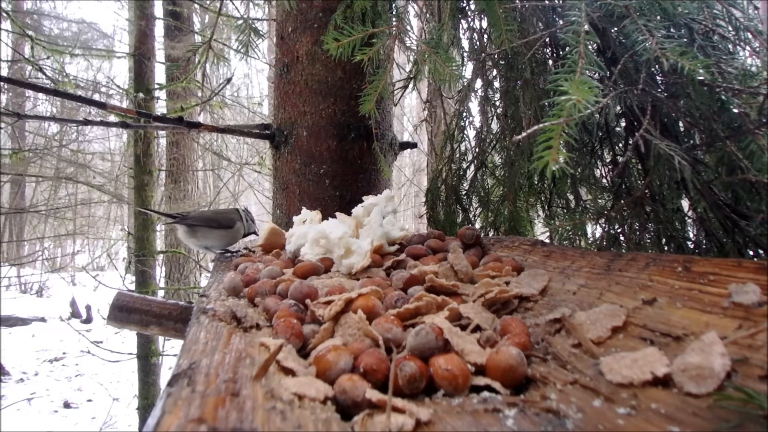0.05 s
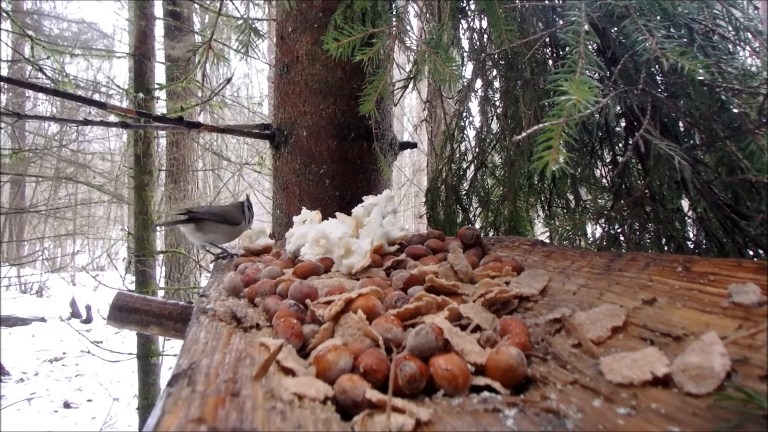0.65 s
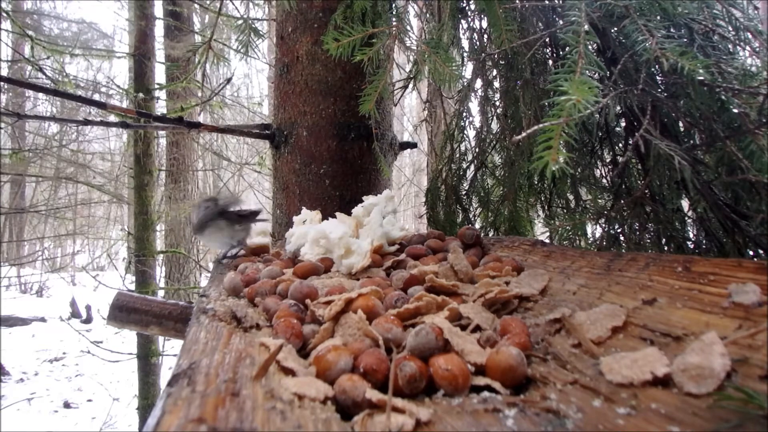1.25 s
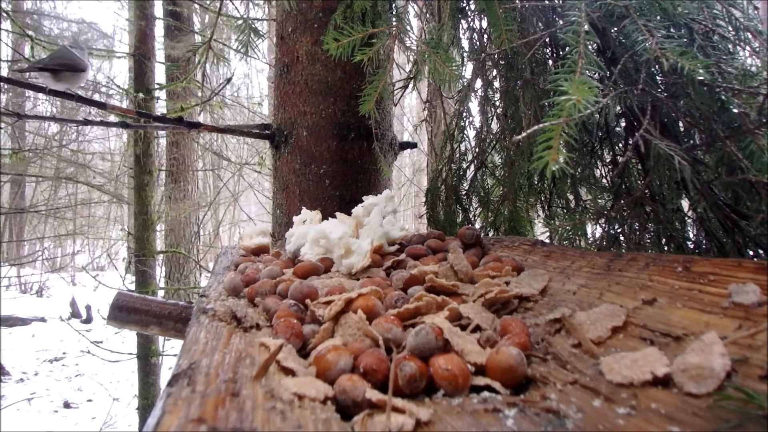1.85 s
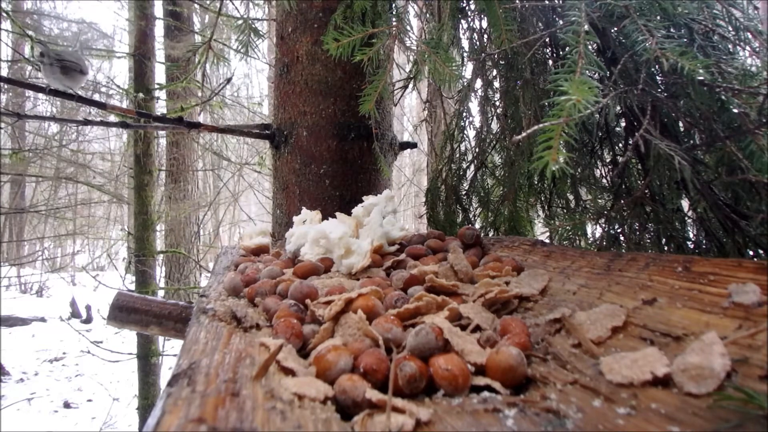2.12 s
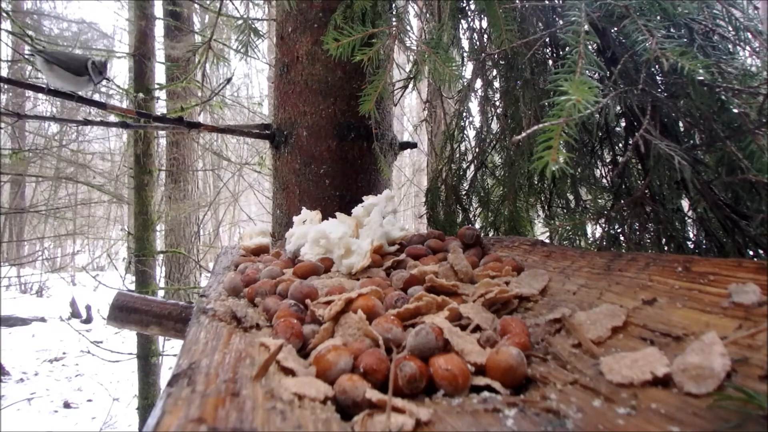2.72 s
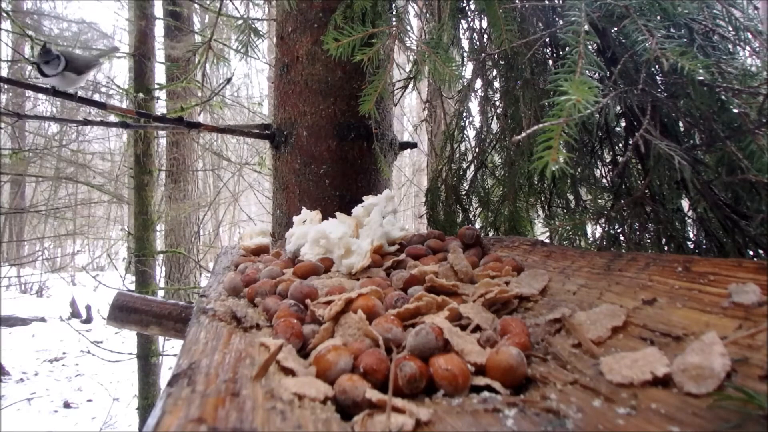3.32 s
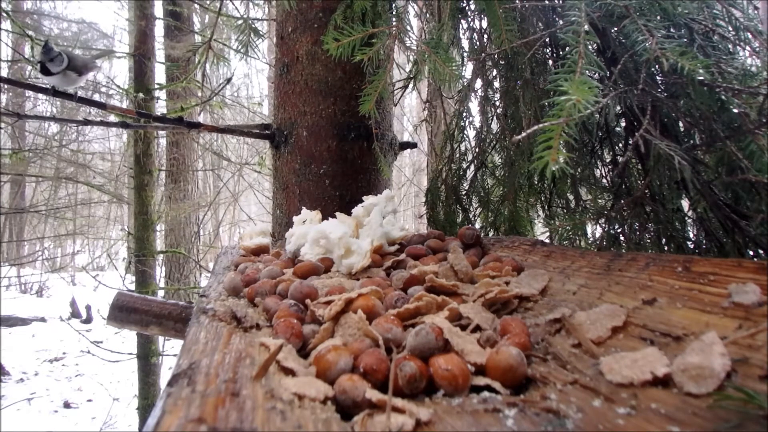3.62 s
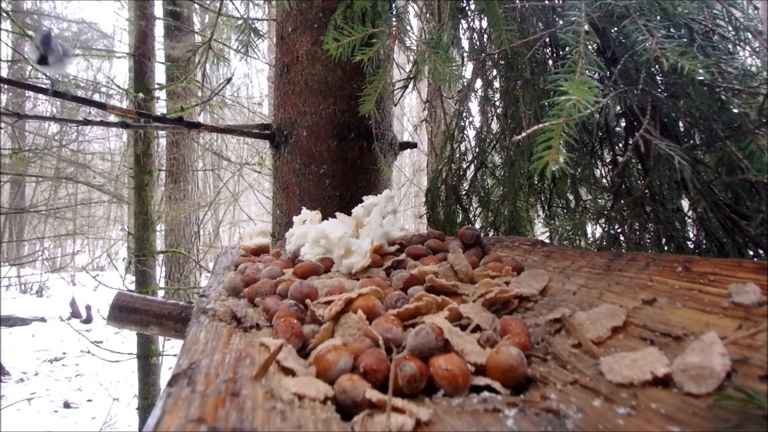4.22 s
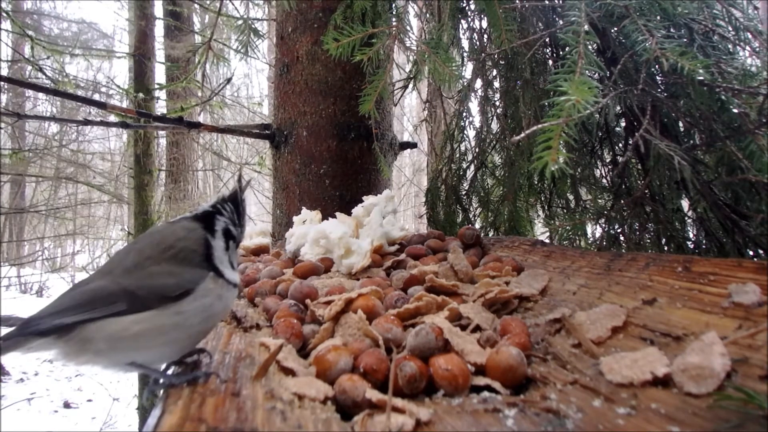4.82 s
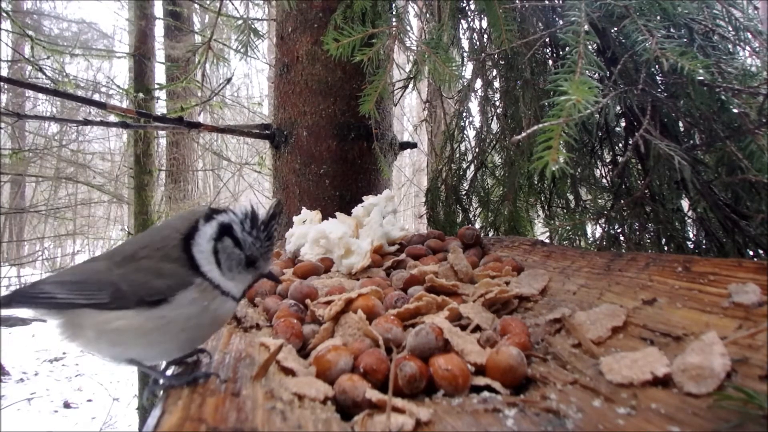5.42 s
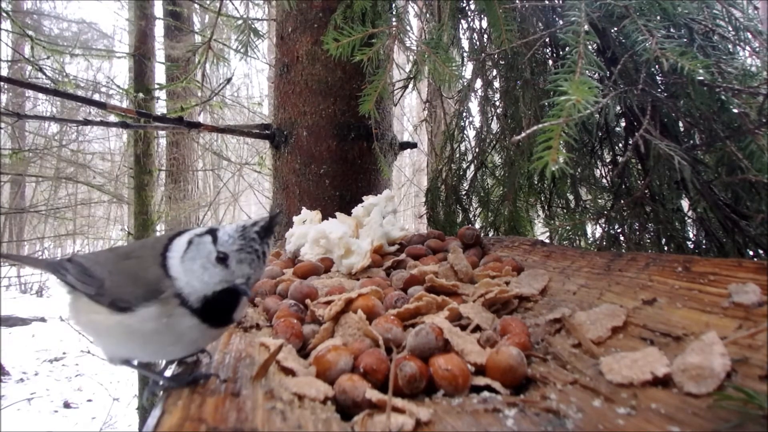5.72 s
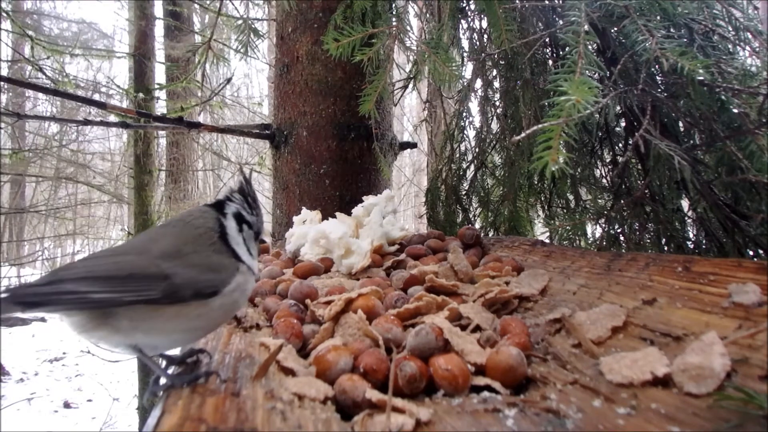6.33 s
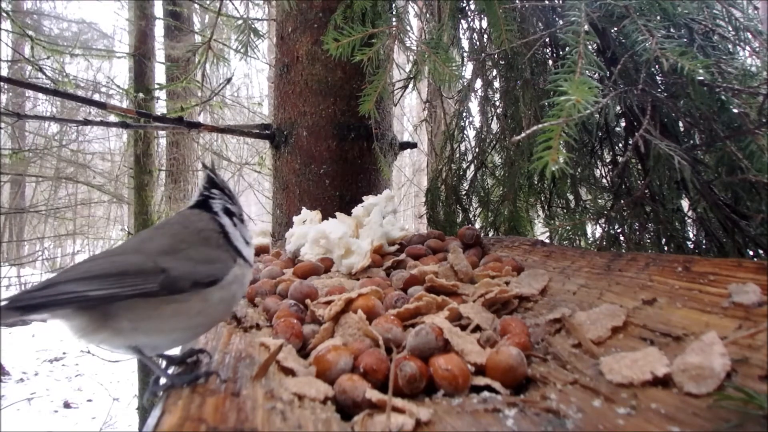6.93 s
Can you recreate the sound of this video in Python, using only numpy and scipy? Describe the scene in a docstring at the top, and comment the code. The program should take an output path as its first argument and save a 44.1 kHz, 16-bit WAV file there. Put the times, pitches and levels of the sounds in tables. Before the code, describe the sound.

High, thin bird calls over a soft forest hush, broken by ticks on wood, a hard click and a low thump of wings.

```python
"""Over the hush of a still winter forest come the thin trilled notes of a crested tit at a wooden feeder.
Its syrinx glides one nearly pure tone into trills, rising whistles and chips; a far bird twitters.
The tit flutters away and back, pushing puffs of air; beak, claws and dropped bits tick on the wood
and briefly ring the housing of a small camera. A morsel drops with a clack; one hard knock drives
the camera's limiter down, and the forest hush creeps back over about a second."""
import sys
import numpy as np
from scipy import signal
from scipy.fft import rfft, irfft
from scipy.io import wavfile
from scipy.ndimage import uniform_filter1d, minimum_filter1d

SR = 44100
rng = np.random.default_rng(int(sys.argv[2]) if len(sys.argv) > 2 else 0)


def pcm_store(signal):
    """Save signal as 16-bit PCM."""
    levels = np.round(np.clip(np.atleast_2d(signal), -1, 1) * 32767)
    wavfile.write(sys.argv[1], SR, levels.astype(np.int16).T)


N = 306936
T = np.arange(N) / SR

# Spectra of forest air, microphone hiss and wing rush. Each row: frequency in Hz, relative density in dB.
FOREST_SPECTRUM = [(20, -8.5), (42, -4.5), (80, -1), (150, -1.5), (280, -6.5), (600, -11.5), (1200, -16.5),
                   (2200, -20.5), (4000, -26), (8000, -57)]
HISS_SPECTRUM = [(1000, -3), (2700, -11.5), (3400, 11.5), (3950, 0.5), (4400, 9), (5200, -3.5), (6000, 3),
                 (7500, -0.5), (9000, 3), (11000, 1.5), (13000, 3), (15500, -2.5)]
RUSH_SPECTRUM = [(30, -4), (80, -2.5), (350, -4.5), (900, -15), (2500, -24), (6000, -31)]
# The far bird's purrs. Each row: start and length in seconds, first pitch, last pitch and pitch scatter
# in Hz, level at the source in dB.
FAR_PURRS = [(.96, .082, 5000, 4400, 300, -57.5), (1.037, .055, 5500, 5900, 850, -58),
             (1.125, .36, 5250, 5200, 950, -58.7), (3.95, .09, 4800, 4800, 1200, -61),
             (4.14, .41, 5100, 5000, 1100, -59)]
# Flutter at the board's edge. Each row: peak time, rise and fall constants in seconds, level in dB.
FLUTTER_BURSTS = [(.88, .15, .11, -48.5), (1.4, .08, .06, -48.5)]
# Wing strokes by the microphone. Each row: time in seconds, push level in dB, eddy level in dB.
WING_STROKES = [(4.455, -48, -43), (4.481, -24.5, -35), (4.515, -24, -34), (4.55, -31.5, -50)]
# Modes of the camera's housing and of a morsel striking the board. Each row: frequency in Hz,
# relative level in dB, time to decay by 60 dB in seconds.
HOUSING_MODES = [(380, -26, 0.0185), (1080, -30, 0.0083), (1700, -15.5, .006), (2370, -3.5, 0.022),
                 (2630, -4, 0.012), (3350, -18, .014), (4600, -14.5, 0.0078), (5780, -23.5, 0.014),
                 (6500, -14, 0.013)]
CLACK_MODES = [(970, -14, .04), (3150, -15, .045), (3623, 0, .028), (3795, -9, .026)]
# Taps on the feeder by beak, claws and dropped bits. Each row: start in seconds, crack level in dB, crack
# centre in Hz, # ring gain in dB, the crack's left minus right in dB.
LIGHT_TAPS = [(1.9952, -35.5, 4500, -49, 7), (2.5915, -47, 7000, -70, 6), (2.6375, -43, 5500, -58, 2),
              (2.877, -43.5, 8000, -70, 5), (3.0075, -42.5, 5500, -64, 3), (3.5818, -25.5, 6500, -33, -3),
              (3.5857, -38, 6400, -43, 9), (3.7568, -40.5, 1400, -64, 0), (4.8047, -46, 6000, -66, 10),
              (5.4436, -34, 4000, -35.5, -1), (5.806, -58, 4000, -43, -4), (6.3958, -48, 4000, -57, 4)]
# The tit's chips. Each row: time of the top and length in seconds, top pitch and droop in Hz, level in dB.
CHIP_NOTES = [(1.5, 0.023, 7880, 1690, -44.5), (1.912, 0.027, 8150, 1500, -45.5),
              (2.479, 0.025, 7540, 1000, -47), (5.089, 0.028, 8010, 1100, -44.5),
              (5.327, .028, 7630, 1100, -48.5), (5.68, 0.026, 7700, 1520, -41.5)]
# Its whistles. Each row: start and length in seconds, first and last pitch in Hz, then starting level,
# change over the note and left minus right in dB.
WHISTLE_NOTES = [(2.104, 0.092, 7400, 7880, -36.2, -9, 7.3), (3.617, .152, 7440, 8190, -37.5, -8.5, 8),
                 (4.414, .218, 7260, 8100, -51, -2.5, 1), (4.862, .142, 7350, 8250, -36, -18, 6.5)]
# Its trills. Each row: start and length in seconds; first and last base pitch, arch, overshoot, final
# drop and trill depth in Hz; base level, change over the note and left minus right in dB.
TRILL_NOTES = [(0.327, 0.179, 8170, 6650, 520, 600, 3000, 430, -36.5, -4.5, 3),
               (0.5505, .13, 7920, 7700, 100, 0, 2200, 170, -34.5, -3.5, 3),
               (0.743, 0.171, 7560, 7200, 500, 0, 900, 330, -38, 0, 3.5),
               (6.717, 0.182, 8300, 6700, 230, 420, 1400, 520, -33, -10, 2.5),
               (6.941, .13, 7890, 7620, 170, 0, 1900, 170, -35, -4.5, 2)]

CONTACT_S = .067
RING_SIDE_DB = -12.5  # the housing's ring reaches the right microphone port more strongly


def undb(db):
    """Amplitude grows tenfold for every 20 dB."""
    return 10 ** (np.asarray(db) / 20)


def unit(x):
    """Normalisation to an rms of one."""
    return x / np.sqrt(np.mean(x ** 2))


def clock(length):
    """Uniform sampling: the sample times of an event, in seconds."""
    return np.arange(int(length * SR)) / SR


def pan(db):
    """Level difference marks direction: two gains, left minus right in dB."""
    return undb(np.array([[db], [-db]]) / 2)


def add(out, start, x):
    """Superposition: a short sound adds to the mix at a time in seconds."""
    i = int(start * SR)
    out[:, i:i + x.shape[-1]] += x[..., :max(N - i, 0)]


def band_noise(size, hz, width_hz):
    """Resonance, applied twice, selects a band of white noise for each ear."""
    b, a = signal.iirpeak(min(hz, SR * .45), hz / min(width_hz, SR / 4), fs=SR)
    noise = rng.standard_normal((2, 2 * size))
    return unit(signal.lfilter(b, a, signal.lfilter(b, a, noise))[:, size:])


def coloured(spectrum):
    """Spectral shaping colours white noise, separately for each ear."""
    hz, db = np.transpose(spectrum)
    bin_hz = np.arange(N // 2 + 1) * SR / N
    gain = undb(np.interp(np.log(bin_hz + 1), np.log(hz), db))
    return unit(irfft(rfft(rng.standard_normal((2, N))) * gain, N))


def drift(size, rate_hz):
    """Averaging smooths random steps into a fluctuation with a spread near one."""
    hold = int(SR / rate_hz)
    steps = np.repeat(rng.standard_normal(size // hold + 2), hold)
    return uniform_filter1d(uniform_filter1d(steps, hold), hold)[:size]


def from_left(x, lag_s):
    """Path difference: sound from the left reaches the right port later."""
    delay = np.exp(-2j * np.pi * np.arange(N // 2 + 1) * SR / N * lag_s)
    return np.array([x[0], irfft(rfft(x[1]) * delay, N)])


def tree_echoes(x, early_db, late_db, early_s=.018, t60=.35, count=12):
    """Reflection from board and trunk gives early echoes; scattering by branches gives a diffuse tail."""
    t = clock(.6)
    early = np.zeros((2, len(t)))
    for ear in early:
        arrivals = (SR * early_s * rng.uniform(.1, 1, count)).astype(int)
        ear[arrivals] = rng.choice([-1, 1], count) / np.sqrt(count)
    late = rng.standard_normal(early.shape) * undb(-60 * t / t60) * np.minimum(t / .012, 1)
    response = undb(early_db) * early + undb(late_db) * unit(late) / np.sqrt(len(t))
    return signal.fftconvolve(x, response, axes=1)[:, :N]


def syrinx(t, hz, db, attack_s, release_s, waver_hz, flicker_db):
    """Self-sustained oscillation gives a nearly pure tone, trembling slightly in pitch and strength."""
    gate = np.clip(t / attack_s, 0, 1) * np.clip((t[-1] - t) / release_s, 0, 1)
    phase = 2 * np.pi * np.cumsum(hz + waver_hz * drift(len(t), 400)) / SR
    return np.sqrt(2) * gate * undb(db + flicker_db * drift(len(t), 123)) * np.sin(phase)


def crack(hz, width_hz, t60):
    """A brief impact has a broad spectrum: decaying noise of set energy, partly alike in both ears."""
    t = clock(CONTACT_S)
    decay = undb(-60 * t / t60)
    rms = np.sqrt(np.mean(decay ** 2))
    alike, apart = (rms * unit(noise * decay) for noise in band_noise(len(t), hz, width_hz))
    return .8 * alike + apart * np.array([[.6], [-.6]])


def ringing(modes):
    """Free vibration: a struck body sounds as a sum of damped sinusoids."""
    t = clock(CONTACT_S)
    return sum(undb(db - 60 * t / t60) * np.sin(2 * np.pi * hz * t) for hz, db, t60 in modes)


def hush(forest_db=-49, hiss_db=-53, sway_db=1.13, side_db=-.96, shared=.26):
    """Broadband noise: far air in the treetops sways gently under the microphone's even hiss."""
    air = coloured(FOREST_SPECTRUM)
    air = unit(air + shared * air.mean(axis=0)) * undb(forest_db + sway_db * drift(N, 4.11))
    return pan(side_db) * air + undb(hiss_db) * coloured(HISS_SPECTRUM)


def far_bird(purr_hz=78, depth=.83, husk_db=-7):
    """Amplitude modulation makes a hoarse voice purr; much of it arrives by way of the trees."""
    out = np.zeros((2, N))
    for start, length, first, last, scatter, db in FAR_PURRS:
        t = clock(length)
        hz = first + (last - first) * t / length + scatter * drift(len(t), 2500)
        purr = 1 + depth * np.sin(2 * np.pi * purr_hz * t + drift(len(t), 25))
        tone = syrinx(t, hz, db, attack_s=.015, release_s=.0086, waver_hz=101, flicker_db=.5)
        husk = undb(db + husk_db) * band_noise(len(t), 9500, 3500)
        add(out, start, purr * (tone + husk))
    return undb(-2.5) * out + tree_echoes(out, early_db=-7.5, late_db=-12)


def flutter(beat_hz=27, depth=.86, side_db=2):
    """Air displacement: the wings push a soft rush once a beat, in bursts that swell and die away."""
    effort = sum(undb(db) * np.exp(-np.maximum((peak - T) / rise, (T - peak) / fall))
                 for peak, rise, fall, db in FLUTTER_BURSTS)
    beat = 1 + depth * np.sin(2 * np.pi * beat_hz * T + drift(N, 9.5))
    return pan(side_db) * coloured(RUSH_SPECTRUM) * beat * effort


def wing_strokes(push_s=.0011, eddy_s=.01, lead_s=.004, side_db=3, feather_db=-22):
    """Near-field flow: each braking stroke pushes a pressure pulse, sheds eddies and rustles feathers."""
    out, t = np.zeros((2, N)), clock(.07)
    pulse_time = (t - lead_s) / push_s
    push = -pulse_time * np.exp((1 - pulse_time ** 2) / 2)
    for time, push_db, eddy_db in WING_STROKES:
        air = band_noise(len(t), 120, 260) + undb(feather_db) * band_noise(len(t), 1500, 5000)
        eddies = air * t / eddy_s * np.exp(1 - t / eddy_s)
        add(out, time - lead_s, pan(side_db) * (undb(push_db) * push + undb(eddy_db) * eddies))
    return out


def taps(width_hz=4800, t60=.01):
    """Impulse excitation: each tap on the feeder cracks and briefly rings the camera's housing."""
    out = np.zeros((2, N))
    ring = pan(RING_SIDE_DB) * ringing(HOUSING_MODES)
    for start, crack_db, hz, ring_db, side_db in LIGHT_TAPS:
        click = pan(side_db) * undb(crack_db) * crack(hz, width_hz, t60)
        add(out, start, click + undb(ring_db) * ring)
    return out


def morsel(start_s=3.5968, bounce_s=.0118, crack_db=-36, crack_loss_db=4, ring_loss_db=14, side_db=3.5):
    """Inelastic collision: a hard morsel clacks on the board and loses energy at each quick bounce."""
    out = np.zeros((2, N))
    ring = pan(side_db) * undb(-26) * ringing(CLACK_MODES)
    ring += pan(RING_SIDE_DB) * undb(-34) * ringing(HOUSING_MODES)
    for bounce in range(3):
        click = undb(crack_db - bounce * crack_loss_db) * crack(hz=3700, width_hz=3200, t60=.021)
        add(out, start_s + bounce * bounce_s, pan(side_db) * click + undb(-bounce * ring_loss_db) * ring)
    return out


def knock(strike_s=4.0747, graze_lead_s=.0028, snap_lead_s=.0004):
    """Hard impact: something grazes the wood close by, then snaps and thuds, ringing the housing."""
    out = np.zeros((2, N))
    graze = crack(hz=6800, width_hz=4500, t60=.016)
    graze += undb(-11) * crack(hz=1500, width_hz=3000, t60=.012)
    add(out, strike_s - graze_lead_s, undb(-16) * graze)
    snap = undb(-7.5) * crack(hz=13200, width_hz=2400, t60=.005)
    snap += undb(-17.5) * crack(hz=6700, width_hz=2000, t60=.011)
    add(out, strike_s - snap_lead_s, pan(-3.5) * snap)
    thud = undb(-14.5) * crack(hz=1500, width_hz=3600, t60=.0065)
    add(out, strike_s, pan(RING_SIDE_DB) * (thud + undb(3) * ringing(HOUSING_MODES)))
    return out


def chips(side_db=3.5, top_share=.45):
    """A rapid frequency sweep, up and down again, is heard as a contact chip."""
    out = np.zeros((2, N))
    for top_s, length, top_hz, droop, db in CHIP_NOTES:
        t = clock(length)
        hz = top_hz - droop * np.sin(np.pi * (t / length - top_share) * .85) ** 2
        tone = syrinx(t, hz, db, attack_s=.009, release_s=.012, waver_hz=40, flicker_db=1)
        add(out, top_s - top_share * length, pan(side_db) * tone)
    return out


def whistles(shiver_hz=96, depth_hz=140, drop_hz=800, drop_s=.0065, throb_db=.8, rasp_hz=90,
             steady_share=.3, wander_hz=35):
    """A frequency glide: each thin note starts clean, then climbs and fades under a rough shiver."""
    out = np.zeros((2, N))
    for start, length, first, last, db, fade_db, side_db in WHISTLE_NOTES:
        t = clock(length)
        progress = t / length
        strain = 1 - np.exp(-(progress / steady_share) ** 2)
        shiver = strain * np.sin(2 * np.pi * shiver_hz * t + .6 * drift(len(t), 40))
        hz = first + (last - first) * progress + depth_hz * shiver
        hz -= drop_hz * np.exp((t - length) / drop_s)
        hz += rasp_hz * progress * drift(len(t), 1500) + wander_hz * drift(len(t), 30)
        level_db = db + fade_db * progress + throb_db * shiver
        tone = syrinx(t, hz, level_db, attack_s=.004, release_s=.012, waver_hz=35, flicker_db=.6)
        add(out, start, pan(side_db) * tone)
    return out


def trills(scoop_hz=5400, scoop_s=.005, drop_s=.0055, trill_hz=53, crest_s=.02, crest_width_s=.0082,
           full_voice_hz=7300, weaker_db_per_hz=.0027, rasp_hz=160, throb_db=1.5):
    """Frequency modulation: each note scoops up, arches with a widening, raspy trill and drops away."""
    out = np.zeros((2, N))
    for start, length, first, last, arch, overshoot, drop, depth, db, fade_db, side_db in TRILL_NOTES:
        t = clock(length)
        progress = t / length
        strain = np.sin(np.pi / 2 * progress) ** 2  # trill and rasp grow as the note tires
        trill = strain * np.cos(2 * np.pi * trill_hz * t + .25 * drift(len(t), 40))
        hz = first + (last - first) * progress + arch * (1 - (2 * progress - 1) ** 2) + depth * trill
        hz += overshoot * np.exp(-((t - crest_s) / crest_width_s) ** 2)
        hz -= scoop_hz * np.exp(-t / scoop_s) + drop * np.exp((t - length) / drop_s)
        level_db = db + fade_db * progress + throb_db * trill
        level_db -= weaker_db_per_hz * np.maximum(full_voice_hz - hz, 0)  # low pitches are weaker
        hz += rasp_hz * strain * drift(len(t), 1500)
        tone = syrinx(t, hz, level_db, attack_s=.012, release_s=.018, waver_hz=55, flicker_db=1)
        add(out, start, pan(side_db) * tone)
    return out


def scene():
    """Direct and reflected sound add: trills scatter most among the trees, chips and whistles less."""
    trilled, chipped, whistled = trills(), chips(), whistles()
    trilled += tree_echoes(trilled, early_db=-7, late_db=-7.2, t60=.42)
    chipped += tree_echoes(chipped, early_db=-7.5, late_db=-11)
    whistled += tree_echoes(whistled, early_db=-14, late_db=-21)
    calls = from_left(trilled + chipped + whistled, lag_s=.00003)
    return hush() + far_bird() + flutter() + wing_strokes() + taps() + morsel() + knock() + calls


def record(dry, ceiling_db=-2.5, recover_db_per_s=12, notch_step_hz=1025, notch_width_hz=110, top_hz=15650):
    """Peak limiting ducks the gain at once and recovers slowly; notches and a low-pass cut the treble."""
    peak = np.abs(dry).max(axis=0) + 1e-9
    over_db = np.maximum(20 * np.log10(peak) - ceiling_db, 0)
    over_db = -minimum_filter1d(-over_db, size=9)  # hold each peak over nine samples
    recovery_db = recover_db_per_s * T
    cut_db = np.maximum.accumulate(over_db + recovery_db) - recovery_db
    out = dry * undb(-cut_db)
    for hz in notch_step_hz * np.arange(2, 7):
        out = signal.lfilter(*signal.iirnotch(hz, hz / notch_width_hz, fs=SR), out)
    return signal.sosfilt(signal.ellip(8, .2, 70, top_hz, fs=SR, output="sos"), out)


dry = scene()
out = record(dry)
pcm_store(out)
```